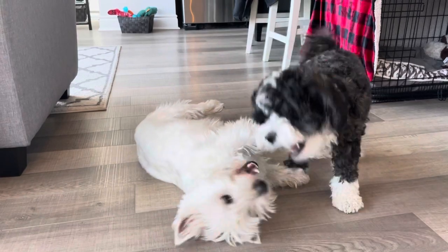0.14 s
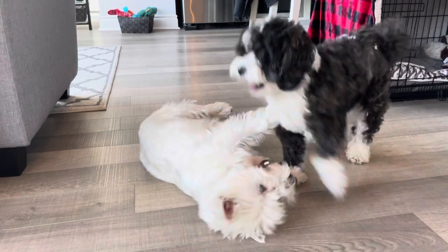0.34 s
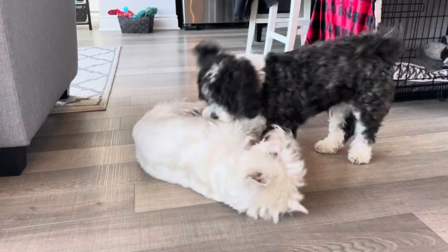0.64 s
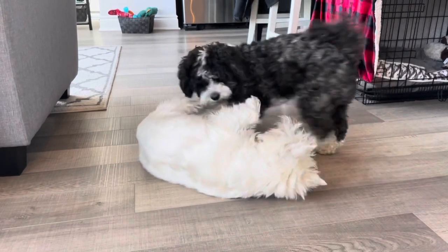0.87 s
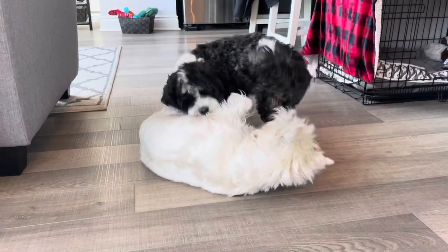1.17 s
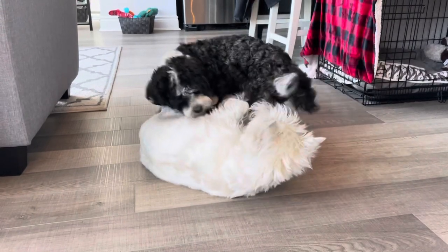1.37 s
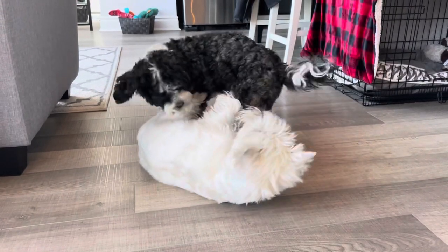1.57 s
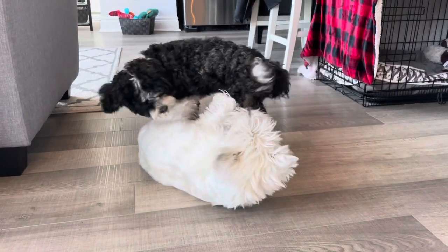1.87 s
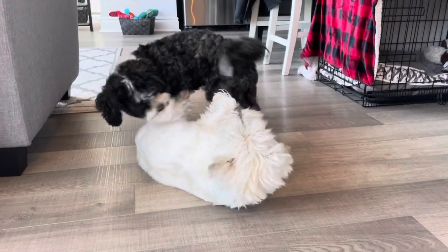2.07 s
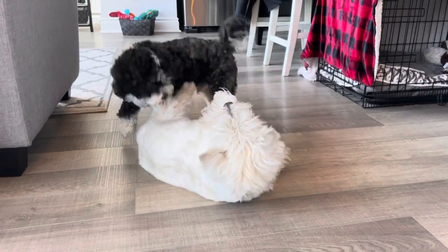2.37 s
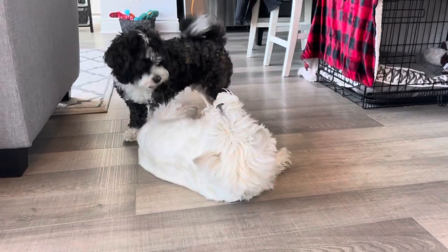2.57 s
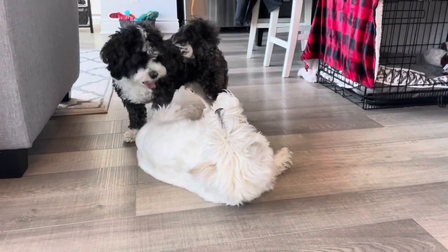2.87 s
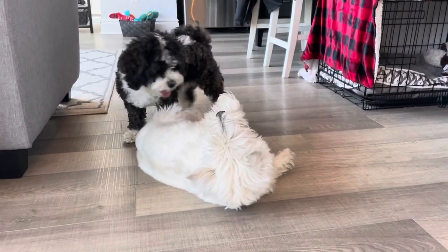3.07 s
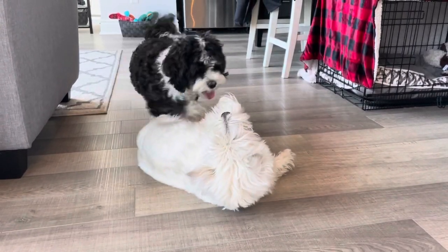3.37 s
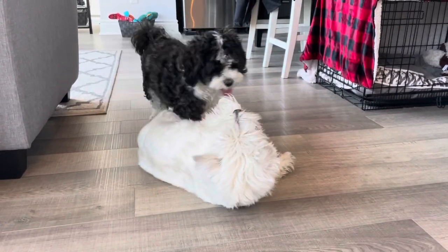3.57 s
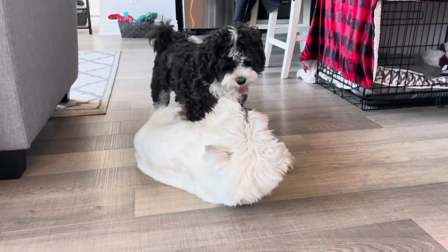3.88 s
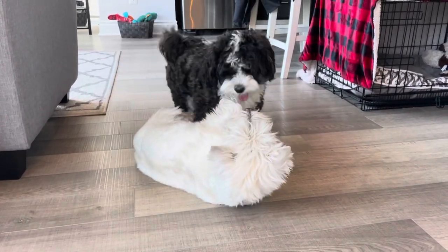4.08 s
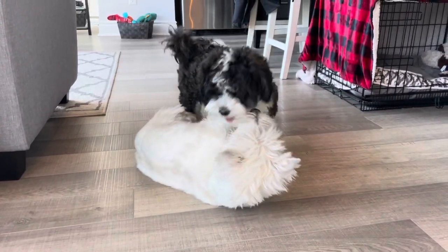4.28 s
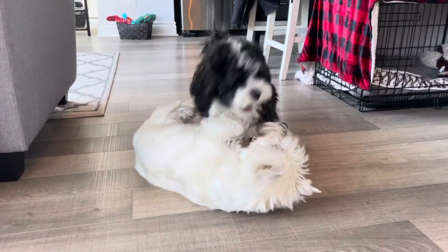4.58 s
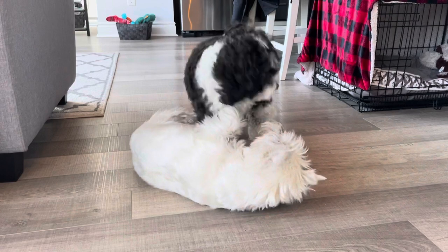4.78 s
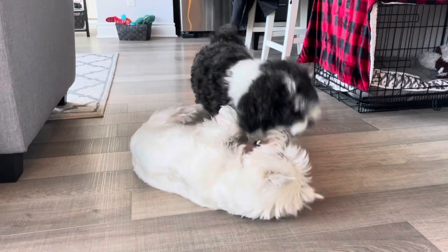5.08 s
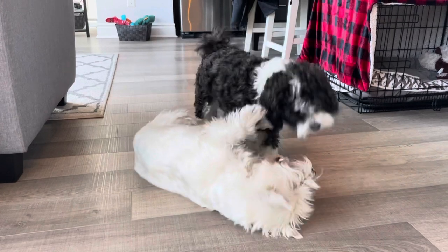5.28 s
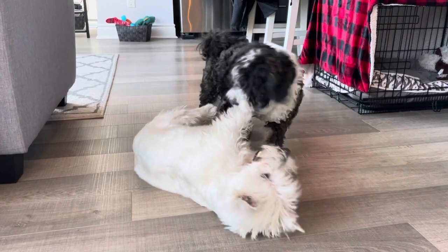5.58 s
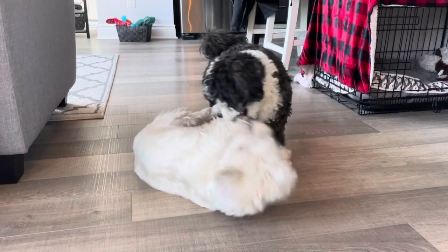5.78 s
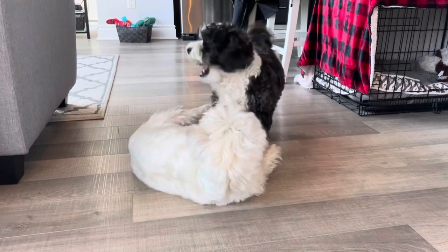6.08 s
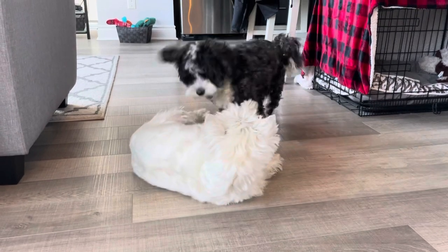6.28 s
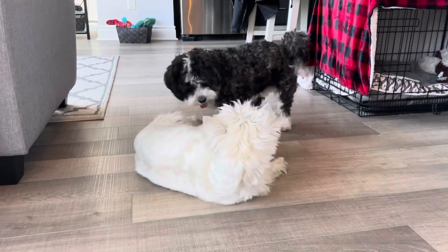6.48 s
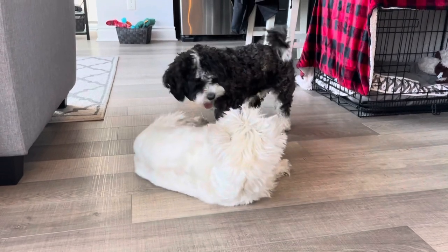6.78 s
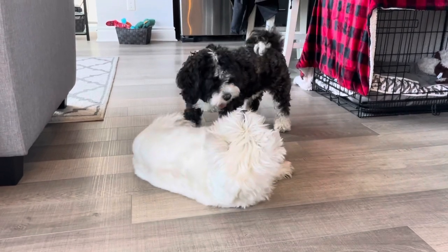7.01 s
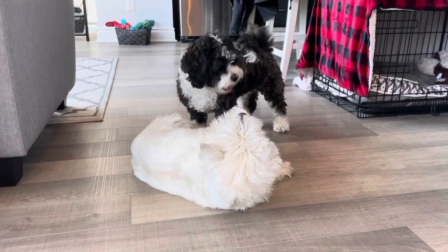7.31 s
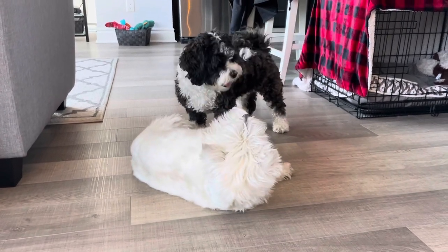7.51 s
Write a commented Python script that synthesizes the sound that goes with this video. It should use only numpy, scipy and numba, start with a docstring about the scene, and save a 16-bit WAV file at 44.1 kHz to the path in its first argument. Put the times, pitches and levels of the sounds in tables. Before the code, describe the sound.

Close, quiet indoor dog play: a loud click and dull thump around half a second, then scattered chattering claw ticks and dry scrapes on boards until about four and a half seconds. Afterwards there are fewer scuffs, soft snuffles, small lip pops, a tiny thin whine just before six seconds and several crisp clicks. Coat hair brushes the floor throughout. A phone captures it in a hard living room with short reverberation and faint low hum.

```python
"""Two small dogs wrestle on a plank floor in a living room, a metre or two from a phone.
Claws and teeth click as chattering rings, paws scuff as jerky friction, and bodies ring the boards.
Mouths smack as falling pops, noses snuffle as ringing puffs of air and once whine as a wavering tone.
Fur rustles as filtered noise and tiny taps with each stroke and roll.
The hard room adds fading echoes, over a low noise rumble and the steady hum of an appliance."""
import sys
import numpy as np
from scipy import signal
from scipy.fft import rfft, irfft, next_fast_len
from scipy.io import wavfile
from scipy.ndimage import uniform_filter1d
from numba import njit

SR = 44100
rng = np.random.default_rng(int(sys.argv[2]) if len(sys.argv) > 2 else 0)


def wav_out(sig):
    """Save sig, one row per channel (or a flat mono array), as 16-bit PCM at SR to the path in sys.argv[1]."""
    wavfile.write(sys.argv[1], SR, np.round(np.clip(np.atleast_2d(sig).T, -1, 1) * 32767).astype(np.int16))


N = 337365
TIME = np.arange(N) / SR  # seconds

# Rumble of the house. Each row: frequency in Hz, relative level in dB.
RUMBLE_SPECTRUM = [(15, -12.5), (26, -10), (36, -15), (52, 3), (78, 4.5), (108, -1), (135, -6), (200, -14),
                   (280, -18.5), (450, -31.5), (800, -35.5), (1400, -40.5), (2400, -53.5), (6000, -57.5),
                   (14000, -66)]
RUMBLE_DB = -52.5
HUM_HZ, HUM_DB = 92.25, -60.5  # middle of the wavering pitch and level

# Paws scuffing the floor. Each row: middle of the slip in seconds, length in seconds, level in dB before
# the shared gain, dull body in dB against the scrape, claw ring in Hz at the middle, claw ring in dB.
PAW_SCUFFS = [(0.013, 0.061, -41, -13, 5300, -8.5), (0.667, 0.014, -39.5, -2.5, 4800, -6),
              (0.765, 0.011, -48.5, 1, 4550, 0), (0.932, 0.017, -57, 6, 4500, 3),
              (1.062, 0.013, -47.5, -8, 4530, 2), (1.179, 0.026, -62, -4, 4550, 5),
              (1.351, 0.015, -52, 2, 5100, 11.5), (1.961, 0.047, -58, -3.5, 5000, -7),
              (1.999, 0.032, -41.5, -4.5, 5300, -2.5), (2.12, 0.024, -54, -4, 4500, 0),
              (2.140, 0.023, -38.5, -7, 3330, -9), (2.257, 0.051, -46.5, -17.5, 4800, 4.5),
              (2.289, 0.051, -51, -2, 4600, 3.5), (2.996, 0.016, -58, -9, 4500, -8),
              (3.019, 0.03, -44, -19, 3620, -12), (3.41, 0.023, -82, 16.5, 4550, 5),
              (3.609, 0.027, -41.5, -6, 7100, -11), (3.921, 0.014, -56, -18, 4500, 7),
              (3.935, 0.021, -38.5, -10, 4550, -0.5), (4.099, 0.01, -39.5, -22.5, 3140, -6.5),
              (4.178, 0.015, -46, -21.5, 4460, -9), (4.342, 0.027, -52, -9, 5700, -1),
              (4.409, 0.014, -59, -10, 5000, -0.5), (4.441, 0.044, -50.5, -13.5, 4300, -1),
              (4.462, 0.035, -40, -8, 5500, -15), (4.772, 0.042, -56.5, -2, 4800, 1),
              (5.362, 0.038, -64, -3.5, 3480, 2), (6.471, 0.056, -68, 5.5, 4550, -3),
              (6.932, 0.018, -53, -3, 4630, -2), (7.138, 0.07, -63, -20, 4420, 1)]
# Scrape of a paw, also the hiss of hair. Each row: frequency in Hz, relative level in dB.
SCRAPE_SPECTRUM = [(800, -31.5), (1900, -16.5), (2900, -0.5), (5000, 1), (7300, -0.5), (8500, -11),
                   (10500, -6.5), (13000, -24.5), (16000, -21.5)]
# Dull answer of the boards to a scuff. Each row: frequency in Hz, relative level in dB.
SCUFF_BODY_SPECTRUM = [(80, 2.5), (250, -29), (600, 8.5), (1100, -13.5), (2200, -3), (3500, -0.5),
                       (7000, -57)]
# A claw catching on the grain of the planks. Each row: frequency in Hz, relative level in dB.
CATCH_SPECTRUM = [(350, -17.5), (700, -6.5), (1400, -6), (2800, -1), (5200, 4.5), (7300, 0), (8500, -15),
                  (10500, -8.5), (14000, -29)]

# The dog on its back rolls and drags its coat. Each row: start in seconds, length in seconds before
# it dies away, level in dB before the mix of the fur, hiss of the hair in dB against that level.
COAT_ROLLS = [(0, 0.11, -56, -8.5), (0.2, 0.4, -63.5, -16), (0.664, 0.35, -58.5, -11.5),
              (1.073, 0.37, -67, -5), (1.365, 0.14, -60, -10.5), (1.585, 0.13, -80, 2),
              (1.783, 0.13, -63.5, -24), (2.369, 0.14, -59.5, -25.5), (3.08, 0.061, -70.5, 2.5),
              (3.24, 0.17, -72.5, -14), (3.504, 0.21, -63.5, -13.5), (4.644, 0.14, -65.5, -32),
              (5.133, 0.12, -62, -10), (5.344, 0.19, -64.5, -21), (5.828, 0.16, -69.5, -8),
              (6.277, 0.13, -65.5, -5)]
# Soft scrub of the coat on the floor. Each row: frequency in Hz, relative level in dB.
DRAG_SPECTRUM = [(100, 5), (300, 0), (500, 1.5), (680, -4.5), (1000, -7.5), (1800, -13.5), (3500, -14.5),
                 (8000, -73.5)]
ROLL_ATTACK_S, ROLL_RELEASE_S = 0.025, .05
# Fur never quite rests; it also rustles as a leg swings to the floor, and settles after the paw lands.
REST_DB, FOLLOW_DB, SWING_S, SETTLE_S = -81, -11.5, 0.043, 0.072

# How long the room rings. Each row: frequency in Hz, time to fall by 60 dB in seconds.
ROOM_DECAY = [(200, 0.36), (800, 0.38), (2000, 0.46), (5000, 0.37), (8000, 0.24), (13000, 0.3)]
# How unlike the echo is in the two ears. Each row: frequency in Hz, side against mid in dB.
ECHO_SPREAD = [(200, -8), (600, -2), (1200, 0), (4500, 0.5), (6800, -5), (8200, -16), (10000, -9),
               (12000, -14)]

# Wet smacks of the mouths. Each row: start in seconds, peak level in dB, cavity pitch in Hz before
# its drop, snap of saliva in dB against the cavity.
MOUTH_SMACKS = [(0.25, -38, 1740, -3.5), (0.8883, -47, 1730, -5), (1.5454, -49, 1590, -14),
                (1.61, -60, 1640, -15), (1.6289, -54, 1610, -11), (3.509, -54.5, 1350, -10),
                (5.215, -51, 1770, -12.5), (5.384, -55.5, 1490, -3), (5.5292, -49.5, 1690, -10),
                (5.579, -57, 1690, -10)]

# Clicks of claws and teeth. Each row: start in seconds, level in dB before the shared gain, ring in Hz near the
# middle of its glide (it starts higher and ends lower), fading time of the chatter in seconds, sharp edge in
# dB, dull body in dB (both against the ring), lag of the floor reflection in milliseconds.
CLAW_CLICKS = [(0.321, -44, 3260, 0.0022, 7, 6.5, 0.87), (0.354, -36.5, 4155, 0.0036, -3, -9, .9),
               (0.385, -43.5, 3330, 0.0035, 4, -8, 1.05), (0.5818, -20.5, 4230, 0.0026, -2, -7, 0.55),
               (0.77, -26.5, 4520, 0.0028, -31, -10, 2.3), (0.828, -43, 2680, 0.0032, -26, 11, 1.1),
               (0.8555, -30.5, 5860, 0.004, -5.5, -6, 0.93), (1.06, -34, 5320, 0.0044, -5.5, -12, .76),
               (1.187, -35.5, 3880, 0.0035, -31, -5.5, 1.04), (1.351, -29, 5140, 0.0053, -31, -9, 0.95),
               (1.844, -25, 4610, 0.0026, -0.5, -19, 1.25), (1.987, -32.5, 6200, .003, 4, -8, .9),
               (2.006, -30, 5050, 0.0026, -4, -5, 1.1), (2.136, -27, 3180, 0.004, -4.5, -22, 0.95),
               (2.286, -31.5, 4800, 0.0033, -13, 0, 1.5), (2.4537, -21.5, 4910, 0.0018, -1, -32.5, .19),
               (3.013, -40, 3660, 0.011, 5, -2, 0.87), (3.2077, -31, 5010, 0.0047, -4, -14.5, 0.86),
               (3.53, -56, 5870, 0.01, 5, 8.5, .9), (3.596, -37.5, 6340, 0.015, 4, -3.5, 0.83),
               (4.0954, -27.5, 5420, 0.0059, 2.5, -7.5, 0.88), (4.3232, -34, 5490, 0.0044, -8, -24.5, 0.38),
               (4.456, -28, 4450, 0.0042, -6, -9, 1.15), (4.47, -32, 5450, 0.0058, -6.5, -10, 0.45),
               (4.744, -49, 4900, 0.0092, -5, -25, .9), (5.149, -48.5, 4180, 0.0073, -14, -18.5, .9),
               (5.6214, -21.5, 4704, 0.0033, 0, -8, 1.06), (5.7560, -27.5, 5700, 0.0034, -4.5, -9, 0.63),
               (5.9954, -22, 4490, 0.0022, -3.5, -11, 0.7), (6.162, -22, 4960, 0.0035, -4.5, -8.5, 0.87),
               (6.274, -28.5, 5300, 0.0039, -1, -2.5, 1.48), (6.913, -37.5, 5430, 0.0046, -9, -24.5, 0.93),
               (7.0848, -27.5, 5330, 0.0029, 2, -6.5, 0.96)]

# Bodies and pads bumping the boards. Each row: start in seconds, level in dB before the shared gain,
# brightness in Hz, contact time in seconds, knock in dB against the ringing boards.
BODY_BUMPS = [ (0.413, -54, 480, 0.0022, 1.5), (0.461, -49.5, 258, 0.0026, 4),
              (0.545, -47, 616, 0.0062, -3), (0.5857, -35.5, 743, 0.003, 0),
              (0.605, -42.5, 539, 0.0032, 11), (0.832, -50, 594, 0.0048, 3), (0.923, -54, 840, 0.0028, -7),
              (1.844, -59, 787, 0.0028, 7), (1.99, -62.5, 910, 0.0035, 0.5), (2.110, -55.5, 603, 0.0024, 6),
              (2.28, -57, 940, 0.004, 3), (3.528, -57, 1315, 0.0034, -2), (3.574, -63, 990, 0.0025, -1),
              (3.598, -60, 940, 0.0018, 9), (4.098, -59.5, 810, 0.0025, 8), (4.438, -58, 955, 0.0032, 8),
              (5.151, -47, 760, 0.003, -3.5), (5.622, -54.5, 856, 0.0029, 2),
              (5.969, -55, 540, 0.0034, 3.5), (6.277, -59.5, 624, 0.002, -2)]
# Ways the boards ring. Each row: pitch in Hz before a small random detune, level in dB,
# time to fall by 60 dB in seconds.
BOARD_MODES = [(121, -6.5, 0.11), (242, -11.5, 0.15), (382.2, -1.5, 0.2), (431, -2, 0.16),
               (473, -0.5, 0.13), (508.4, -6.5, 0.22), (587, -3, 0.12), (617, -5, 0.057), (692, 2, 0.11),
               (804, -7, 0.1), (1220, -18.5, .04)]

# Coats rubbing past each other; the row at 6.005 s is instead the low hum of a whimper. Each row: loudest
# moment in seconds, half length in seconds, level in dB before the shared gain, pitch in Hz, width in Hz.
COAT_RUBS = [(0.52, .025, -64, 1118, 800), (1.579, 0.041, -72, 1210, 497), (1.961, 0.022, -65, 805, 600),
             (6.005, 0.049, -59, 530, 230)]

# Snuffles through the noses. Each row: start in seconds, length in seconds before the release,
# level in dB, nasal resonance in Hz at the middle, glide in octaves.
NOSE_SNUFFS = [(1.277, 0.075, -66, 1550, .1), (1.772, .045, -69.5, 2190, -.15),
               (5.241, 0.072, -63, 1800, .1), (5.44, .16, -69.5, 1540, .1), (5.921, 0.066, -72.5, 1465, 0),
               (7.398, 0.077, -75.5, 1650, -.15), (7.555, .04, -73.5, 1720, -.1)]

# A thin nasal whine. The one row: loudest moment in seconds, half length in seconds,
# middle level in dB, middle pitch in Hz.
NASAL_WHINE = (5.957, 0.027, -62, 1449)

# How far the phone's left microphone port leads the right. Each row: frequency in Hz, lead in radians.
PORT_LEAD = [(2000, 0), (3000, .7), (5200, .2), (6900, -1), (8100, -3.14), (10000, -4.9), (11300, -6.2),
             (12700, -6.9), (14200, -9.3)]
# How much louder the left port is. Each row: frequency in Hz, difference in dB.
PORT_BALANCE = [(80, -2), (400, 1), (1500, 0.5), (4500, 2), (8000, -0.5)]
TOP_HZ = 15700


def undb(db):
    """Turn decibels into a gain."""
    return 10 ** (np.asarray(db) / 20)


def unit(x):
    """Scale to an rms of 1."""
    return x / np.sqrt(np.mean(x ** 2))


def along(points, hz):
    """Read (Hz, value) points on a log-frequency axis."""
    f, value = np.transpose(points)
    return np.interp(np.log(hz + 1), np.log(f), value)


def colour(x, points):
    """Filter x by a curve of (Hz, dB) points."""
    size = next_fast_len(len(x))
    gain = undb(along(points, np.fft.rfftfreq(size, 1 / SR)))
    return irfft(rfft(x, size) * gain, size)[:len(x)]


@njit
def svf(x, hz, width):
    """State-variable band-pass filter whose centre may move every sample."""
    y, band, low = np.empty(len(x)), 0., 0.
    for i in range(len(x)):
        g, k = np.tan(np.pi * hz[i] / SR), width / hz[i]
        v = (band + g * (x[i] - low)) / (1 + g * (g + k))
        band, low, y[i] = 2 * v - band, low + 2 * g * v, k * v
    return y


def ring(x, hz, width_hz):
    """A resonance: two band-passes in a row give it steep skirts."""
    centre = np.minimum(hz * np.ones(len(x)), .44 * SR)
    once = svf(x, centre, float(width_hz))
    return svf(once, centre, float(width_hz))


def grit(size, spread_db):
    """Friction: noise made of tiny catches of 32 samples, each of its own strength."""
    strength = undb(spread_db * np.repeat(rng.standard_normal(size // 32 + 1), 32))
    return rng.standard_normal(size) * strength[:size]


def walk(rate):
    """A random wander of rms 1, smoothed over steps of 1 / rate seconds."""
    k = int(SR / rate)
    steps = np.repeat(rng.standard_normal(N // k + 2), k)
    smooth = uniform_filter1d(uniform_filter1d(steps, k), k)
    return unit(smooth[:N])


def add(track, s, sound):
    """Mix a sound into a track from time s."""
    start = int(s * SR)
    a, b = max(start, 0), min(start + sound.shape[-1], N)
    track[..., a:b] += sound[..., a - start:b - start]


def mirrored(x, lag_ms, mirror_db):
    """The hard floor sends a copy a moment later, cutting a comb into the spectrum."""
    hz, gain = np.fft.rfftfreq(len(x), 1 / SR), undb(mirror_db)
    comb = 1 + gain * np.exp(-2j * np.pi * hz * lag_ms / 1000)
    return irfft(rfft(x) * comb, len(x)) / np.hypot(1, gain)  # holds the average power


def background(gain_db=0.0, wide_hz=430):
    """Low rumble of the house, alike in both ears in the bass, and a wavering appliance hum."""
    mid, side = (unit(colour(rng.standard_normal(N), RUMBLE_SPECTRUM)) for _ in range(2))
    no_bass = signal.butter(1, wide_hz, "high", fs=SR, output="sos")
    side = 0.84 * signal.sosfilt(no_bass, side)
    rumble = undb(RUMBLE_DB + gain_db) * (mid + side * np.array([[1], [-1]]))
    hum_phase = 2 * np.pi * np.cumsum(HUM_HZ + 0.7 * walk(6)) / SR
    hum = np.sqrt(2) * np.sin(hum_phase) * undb(HUM_DB + 2 * walk(7.3))
    return rumble + hum


def scuffs(gain_db=-5.5, catch_db=-2, ring_width_hz=2000, spread_db=4.0, slowing=0.071, jerk_s=0.0016,
           graze_db=-20, own_jerk_db=0.5, lag_ms=0.899, mirror_db=-8):
    """A paw slips in jerks: friction and snags ring claws and boards; the claws sink in pitch as it stops."""
    out, size, jerk = np.zeros(N), 16384, int(jerk_s * SR)
    t = TIME[:size] - TIME[size // 2]
    for s, length, db, body_db, ring_hz, ring_db in PAW_SCUFFS:
        phase = 2 * t / length  # -1 to 1 across the slip
        jerks, claw_jerks, board_jerks = unit(uniform_filter1d(rng.standard_normal((3, size)), jerk))
        # the paw grazes the floor, then bites and lets go abruptly
        bite_shape = np.exp(-phase ** 4)
        bite = bite_shape * undb(2.2 * jerks)
        graze = undb(graze_db + 2 * jerks) * np.exp(-(phase / 2) ** 2)
        scrape = unit(colour(grit(size, spread_db), SCRAPE_SPECTRUM))
        # claws and pads catch at different moments
        pitch = ring_hz * (1 - slowing * np.tanh(phase))
        claw_ring = ring(grit(size, spread_db), pitch, ring_width_hz)
        claws = undb(ring_db) * unit(undb(own_jerk_db * claw_jerks) * claw_ring)
        board_noise = colour(grit(size, spread_db), SCUFF_BODY_SPECTRUM)
        boards = undb(body_db) * unit(undb(own_jerk_db * board_jerks) * board_noise)
        own_lag_ms = lag_ms * (1 + .1 * rng.standard_normal())
        rasp = mirrored(scrape + boards, own_lag_ms, mirror_db)
        snags = undb(catch_db) * bite_shape * catches(size)
        add(out, s + t[0], undb(db + gain_db) * ((bite + graze) * (rasp + claws) + snags))
    return out


def catches(size, per_s=180, spread_db=4):
    """A claw snags at uneven moments, each snag sending a chirp through the planks; rms 1."""
    strength = undb(spread_db * np.clip(rng.standard_normal(size), -1.5, 1.5))
    snags = (rng.random(size) < per_s / SR) * strength
    return unit(bending(colour(snags, CATCH_SPECTRUM)))


def bending(x, travel_ms=6.5):
    """Planks carry the highs fastest, so each tick arrives as a falling chirp."""
    khz = np.fft.rfftfreq(len(x), 1 / SR) / 1000
    # the delay is travel_ms * (1 / sqrt(khz) - 0.4), which is zero at 6.25 kHz
    cycles = travel_ms * (2 * np.sqrt(khz) - khz / 2.5)
    return irfft(rfft(x) * np.exp(-2j * np.pi * cycles), len(x))


def fur(paws, drag_db=-5.0, taps_db=-13, leg_hiss_db=-7, flutter_db=3):
    """Rolls and leg strokes drag the coat over the floor: a soft scrub, tiny taps and the hiss of the hair."""
    (roll, hair), legs = rolling(), stirring(paws)
    flutter = undb(flutter_db * walk(35))
    drag = unit(colour(grit(N, spread_db=2.5), DRAG_SPECTRUM))
    scrub = undb(drag_db) * flutter * drag + undb(taps_db) * taps()
    hiss = unit(flutter * colour(grit(N, spread_db=4.0), SCRAPE_SPECTRUM))
    scrub_level = np.hypot(roll + undb(REST_DB), legs)
    hiss_level = np.hypot(hair, undb(leg_hiss_db) * legs)
    return scrub_level * scrub + hiss_level * hiss


def rolling():
    """How hard the lying dog rolls, and how much its hair hisses: each roll swells, holds and dies away."""
    effort, hair = np.zeros((2, N))
    for s, length, db, hiss_db in COAT_ROLLS:
        swell = np.clip((TIME - s) / ROLL_ATTACK_S, 0, 1)
        release = np.exp(-np.maximum(TIME - s - length, 0) / ROLL_RELEASE_S)
        roll = undb(db) * swell * release
        effort += roll
        hair += undb(hiss_db) * roll
    return effort, hair


def stirring(paws):
    """How much the legs stir the coat: it builds just before each paw sound, follows it and settles."""
    keep = np.exp(-2 / (SETTLE_S * SR))
    power = signal.lfilter([1 - keep], [1, -keep], paws ** 2)
    # a centred average looks ahead, so the rustle begins before the paw lands
    return undb(FOLLOW_DB) * np.sqrt(np.abs(uniform_filter1d(power, int(SWING_S * SR))))


def taps(per_s=45, low_hz=450, high_hz=2000):
    """Many tiny contacts of pads, legs and mouths, each dying within a few cycles; rms 1."""
    out, t = np.zeros(N), TIME[:2048]
    for when, pitch, size in rng.random((int(per_s * N / SR), 3)):
        hz = low_hz * (high_hz / low_hz) ** pitch
        age = t * hz  # in cycles
        add(out, when * N / SR, size * age * np.exp(-age) * np.sin(2 * np.pi * age))
    return unit(out)


def room(x, wet_db=-5, gap_s=0.0076):
    """Walls and furniture answer after a short gap with noise; each band dies at its own speed."""
    t = TIME[:32768]
    hz = np.fft.rfftfreq(len(t), 1 / SR)
    noise, tail = rfft(rng.standard_normal((2, len(t)))), 0
    band_hz = np.array(ROOM_DECAY)[:, 0]
    for own, (_, t60) in zip(np.eye(len(ROOM_DECAY)), ROOM_DECAY):
        band = along(np.column_stack([band_hz, own]), hz)  # 1 at its own frequency, 0 at the others
        tail = tail + irfft(noise * band) * np.exp(-np.log(1000) * t / t60)
    tail = tail * (1 - np.exp(-(t / gap_s) ** 2))
    mid, side = (signal.fftconvolve(x, h / np.linalg.norm(h))[:N] for h in tail)
    return undb(wet_db) * (mid + colour(side, ECHO_SPREAD) * np.array([[1], [-1]]))


def moving_room(x, count=3):
    """The dogs keep shifting, so their sounds reach the walls by one set of paths after another."""
    spot = TIME / .21  # a new set every 0.21 s, in a cycle
    out = 0
    for k in range(count):
        away = np.abs((spot - k + count / 2) % count - count / 2)
        share = np.sqrt(np.maximum(1 - away, 0))  # fades between sets at equal power
        out = out + room(x * share)
    return out


def smacks(gain_db=0, length_s=0.0015, drop=0.2, saliva_width_hz=1500):
    """Lips part and two resonances of the mouth pop, dropping in pitch as it opens."""
    out, t = np.zeros(N), TIME[:2048]
    for s, db, hz, saliva_db in MOUTH_SMACKS:
        swell = t / length_s * np.exp(-t / length_s)
        pitch = hz * (0.78 + drop * np.exp(-t / 0.0061))
        phase = 2 * np.pi * np.cumsum(pitch) / SR
        cavity = np.sin(phase) + .35 * np.sin(.78 * phase)
        saliva = unit(ring(rng.standard_normal(len(t)), 1.15 * hz, saliva_width_hz))
        pop = swell * (cavity + undb(saliva_db) * saliva)
        add(out, s, undb(db + gain_db) * pop / np.abs(pop).max())
    return out


def clicks(gain_db=-13, glide=0.616, glide_s=0.00239, ring_width_hz=1800, clean_db=-1, broad_db=-2,
           attack_s=0.0018, pan_db=1.0, apart_db=-6, mirror_db=-4, strike_echo_db=-8):
    """A hard tip strikes and chatters briefly, its ring dropping in pitch as the contact settles.
    Returns what reaches the phone and what spreads to the walls."""
    out, to_walls, t = np.zeros((2, N)), np.zeros(N), TIME[:2048]
    sides = np.array([[1], [-1]])
    for s, db, hz, length, edge_db, body_db, lag_ms in CLAW_CLICKS:
        tip, broad, edge, body, uneven = rng.standard_normal((5, len(t)))
        fade = np.exp(-t / length)
        push = fade * (1 - np.exp(-t / attack_s))
        pitch = hz * (1 + glide * (np.exp(-t / glide_s) - .3))
        # the strike rings cleanly, the chatter roughly
        clean = np.sin(2 * np.pi * np.cumsum(pitch) / SR)
        strike = undb(clean_db) * unit(push * fade ** .5 * clean)
        tone = unit(ring(tip * push, pitch, ring_width_hz))
        tone += undb(broad_db) * unit(ring(broad * push, 4140, 4200))
        # the sharp edge comes first and dies first; the dull body builds a moment later
        tone += undb(edge_db) * unit(ring(edge * fade ** 1.5, 8630, 6400))
        tone += undb(body_db) * unit(ring(body * push, 2200, 3500))
        # part of the chatter, around 2.3 kHz, reaches the two ears with opposite sign
        apart = undb(apart_db) * unit(ring(uneven * push, 2300, 1800))
        gain = np.sqrt(np.mean(fade ** 2)) * undb(db + gain_db + pan_db * sides / 2)
        add(out, s, gain * (mirrored(strike + tone, lag_ms, mirror_db) + sides * apart))
        add(to_walls, s, gain.mean() * (tone + undb(strike_echo_db) * strike))
    return out, to_walls


def bumps(gain_db=-12, sink_s=0.00591, low_share=0.362, detune=0.0016):
    """A soft blow rings the boards; longer contact builds slower, less brightness reaches fewer high modes."""
    out, t = np.zeros(N), TIME[:8192]
    mode_hz, mode_db, t60 = np.transpose(BOARD_MODES)[:, :, None]
    for s, db, bright_hz, contact_s, thud_db in BODY_BUMPS:
        hz = mode_hz * (1 + detune * rng.standard_normal(mode_hz.shape))
        reach = undb(mode_db) / (1 + (hz / bright_hz) ** 4) * rng.choice([-1, 1], hz.shape)
        decay = np.exp(-np.log(1000) * t / t60)
        modes = np.sum(reach * np.sin(2 * np.pi * hz * t) * decay, axis=0)
        # bending waves carry the highs fastest, so the knock arrives as a falling sweep
        sweep_hz = bright_hz * (low_share + np.exp(-t / sink_s))
        thud = np.sin(2 * np.pi * np.cumsum(sweep_hz) / SR) * t * np.exp(-t / contact_s)
        press = 1 - np.exp(-(t / contact_s) ** 2)
        add(out, s, undb(db + gain_db) * unit(unit(press * modes) + undb(thud_db) * unit(thud)))
    return out


def rubs(gain_db=-1, spread_db=2):
    """Single soft brushes of one dog against the other, and one low whimper: noise in a band."""
    out, size = np.zeros(N), 16384
    t = TIME[:size] - TIME[size // 2]
    for s, length, db, hz, width_hz in COAT_RUBS:
        brush = unit(ring(grit(size, spread_db), hz, width_hz))
        add(out, s + t[0], undb(db + gain_db) * np.exp(-(t / length) ** 2) * brush)
    return out


def snuffs(gain_db=0, width_hz=750, upper_db=-13, throat_db=-12, flutter_db=2.0, onset_s=.014,
           release_s=0.0091):
    """A puff of air rings the nose and throat; the wet nostrils make it flutter."""
    out, t = np.zeros(N), TIME[:12288]
    for s, length, db, hz, glide in NOSE_SNUFFS:
        pitch = hz * 2 ** (glide * (np.minimum(t / length, 1) - .5))
        nose = unit(ring(grit(len(t), 3), pitch, width_hz))
        nose += undb(upper_db) * unit(ring(grit(len(t), 3), 1.3 * pitch, width_hz))
        nose += undb(throat_db) * unit(ring(grit(len(t), 2.7), 0.6 * pitch, width_hz))
        flutter = undb(flutter_db * unit(uniform_filter1d(rng.standard_normal(len(t)), size=220)))
        flow = np.minimum(t / onset_s, 1) * np.exp(-np.maximum(t - length, 0) / release_s)
        add(out, s, undb(db + gain_db) * flow * unit(nose * flutter))
    return out


def whine(waver=0.0301, flutter_db=2.0):
    """A brief whistle through a dog's nose, unsteady in pitch and level."""
    s, length, db, hz = NASAL_WHINE
    phase = 2 * np.pi * np.cumsum(hz * (1 + waver * walk(300))) / SR
    swell = np.exp(-((TIME - s) / length) ** 2)
    return undb(db + flutter_db * walk(160)) * swell * np.sin(phase)


def scene(mouth_echo_db=-4.0):
    """The dogs, their echo and the house; the mouths point at the phone and stir the room less."""
    claws, claws_to_walls = clicks()
    slips = scuffs()
    mouths = smacks() + snuffs() + whine()
    bodies = slips + bumps() + fur(claws_to_walls + slips) + rubs()
    echo = moving_room(claws_to_walls + bodies + undb(mouth_echo_db) * mouths)
    return claws + bodies + mouths + echo + background()


def record(dry):
    """The phone's two ports differ in phase and level; the top is cut."""
    size = next_fast_len(N + 4096)
    hz = np.fft.rfftfreq(size, 1 / SR)
    sides = np.array([[1], [-1]]) / 2
    level = undb(sides * along(PORT_BALANCE, hz))
    lead = np.exp(1j * np.array([[1], [0]]) * along(PORT_LEAD, hz))  # left only
    heard = irfft(rfft(dry, size) * level * lead, size)[:, :N]
    top_cut = signal.ellip(8, .2, 70, TOP_HZ, fs=SR, output="sos")
    return signal.sosfilt(top_cut, heard)


dry = scene()
out = record(dry)
wav_out(out)
```